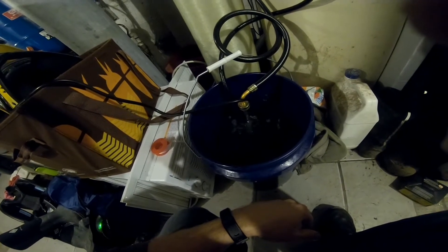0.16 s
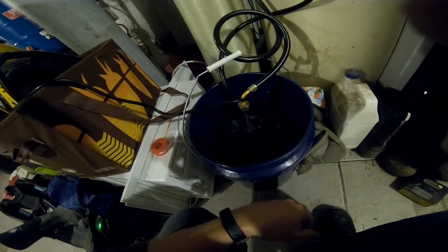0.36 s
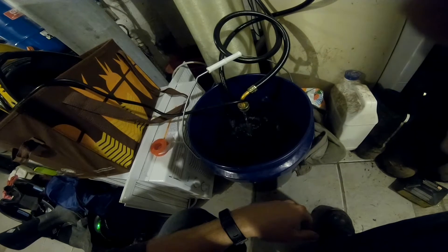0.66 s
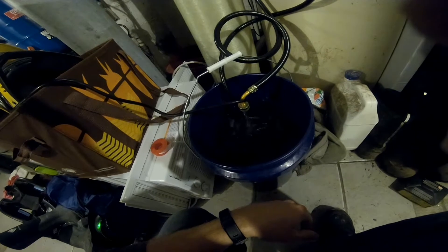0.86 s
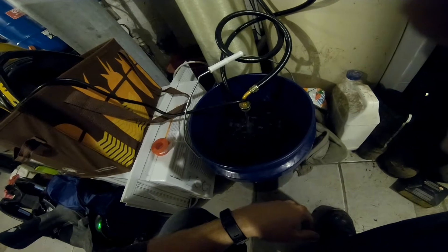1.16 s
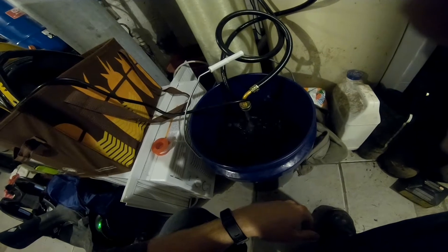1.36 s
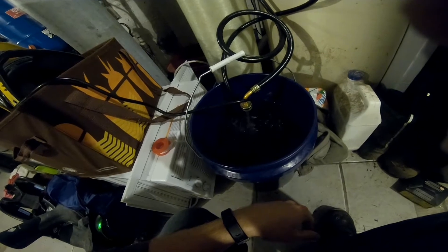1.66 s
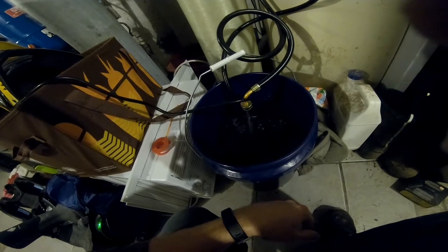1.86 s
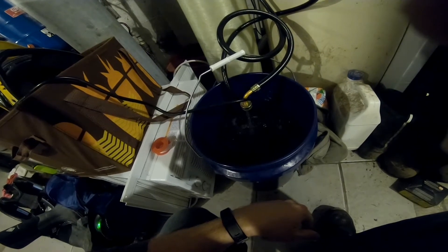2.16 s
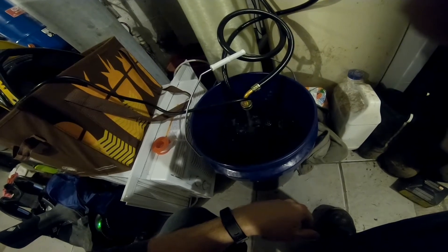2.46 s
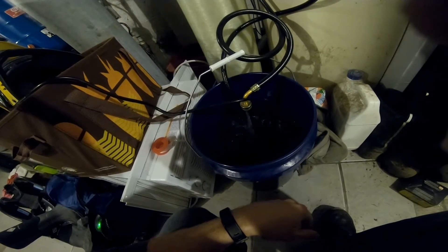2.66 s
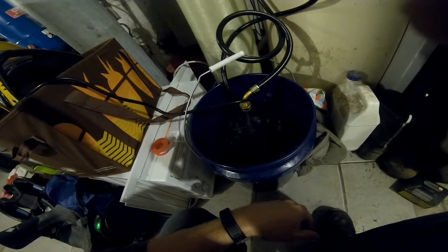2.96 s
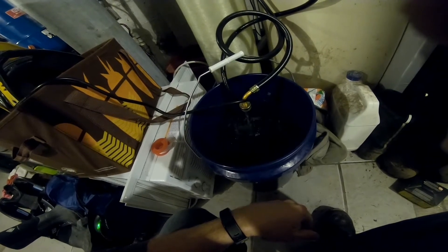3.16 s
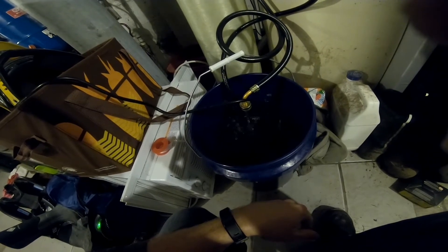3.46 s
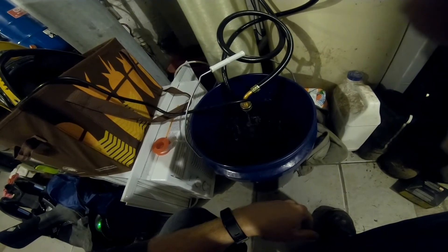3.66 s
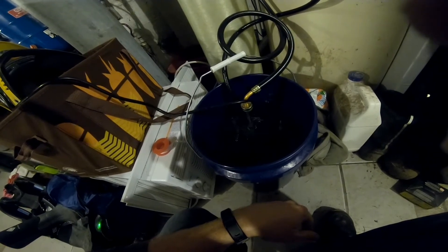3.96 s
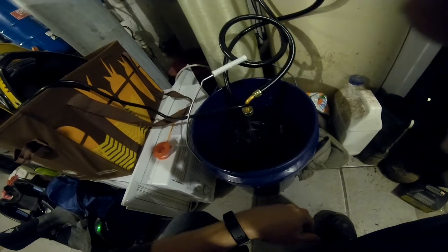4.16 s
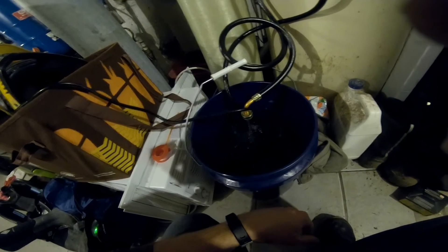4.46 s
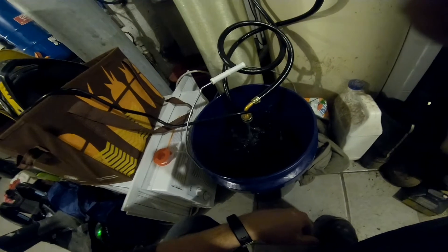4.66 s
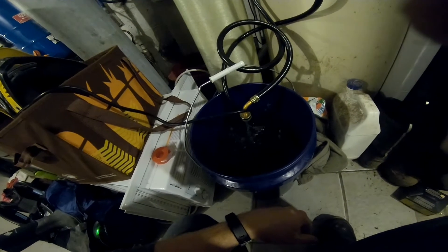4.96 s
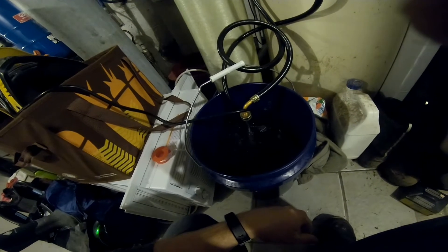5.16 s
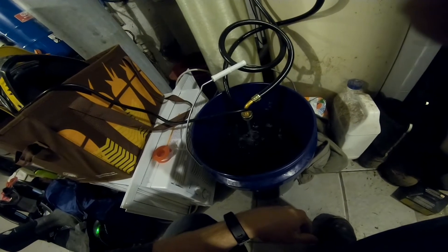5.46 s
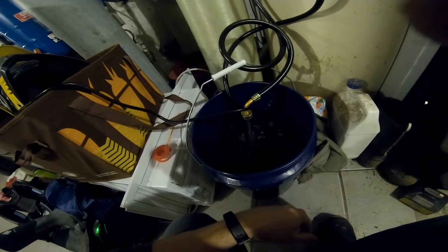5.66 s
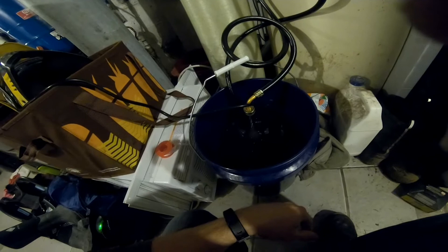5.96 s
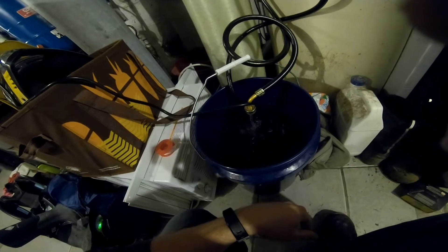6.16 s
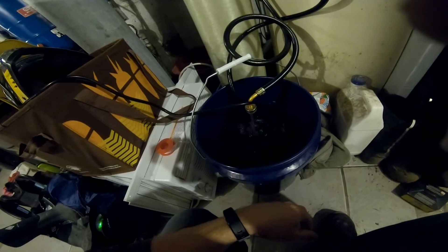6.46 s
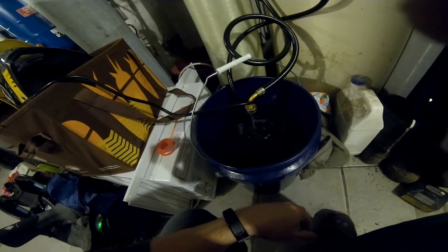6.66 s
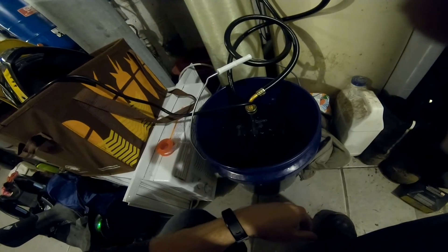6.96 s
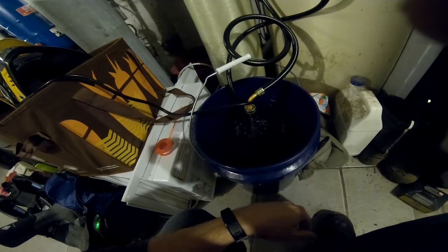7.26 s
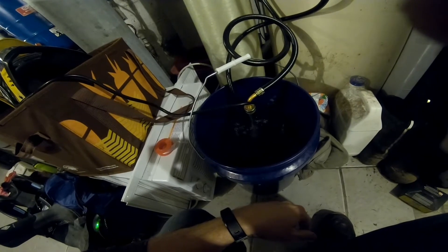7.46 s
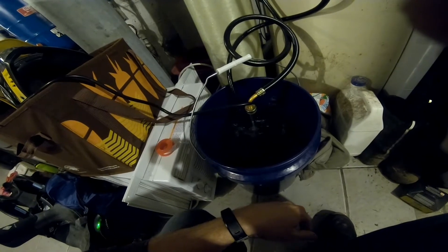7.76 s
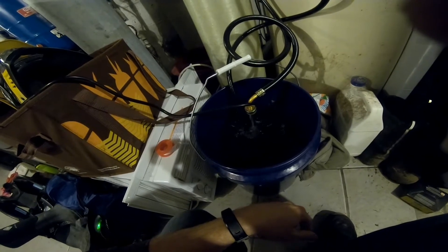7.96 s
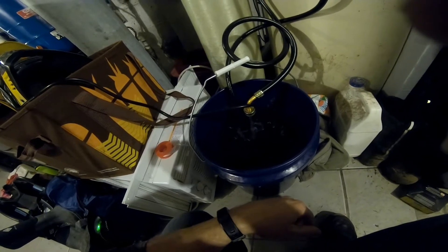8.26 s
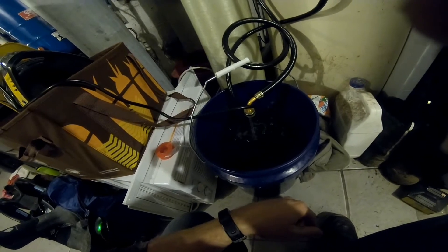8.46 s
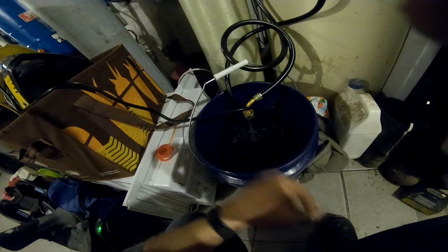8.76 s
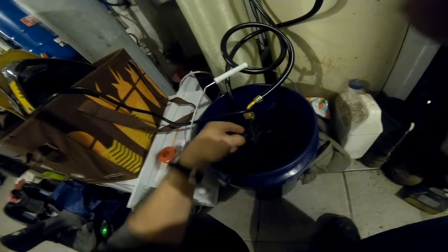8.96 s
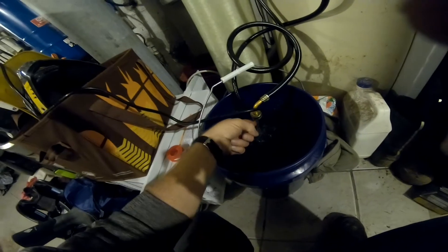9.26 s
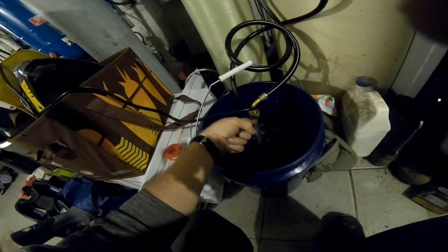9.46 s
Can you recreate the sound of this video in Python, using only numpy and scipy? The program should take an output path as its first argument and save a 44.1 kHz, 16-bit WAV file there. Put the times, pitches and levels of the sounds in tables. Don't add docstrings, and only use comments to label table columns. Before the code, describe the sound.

Close, lively water dribble with bright splats, ticks and hollow plops in a bucket, while a small pump hums steadily underneath.

```python
import sys
import numpy as np
from scipy import signal
from scipy.fft import rfft, irfft, next_fast_len
from scipy.io import wavfile
from scipy.ndimage import uniform_filter1d

SR = 44100
rng = np.random.default_rng(int(sys.argv[2]) if len(sys.argv) > 2 else 0)


def voltage_ratio(level):
    return 10 ** (np.asarray(level, float) / 20)


def int16_out(signal):
    q = np.round(np.clip(np.atleast_2d(signal).T, -1, 1) * 32767)
    wavfile.write(sys.argv[1], SR, q.astype(np.int16))


N = 424241


def evened(x):
    return x / np.sqrt(np.mean(x ** 2) + 1e-20)


def read(points, hz):
    f, value = np.transpose(points)
    return np.interp(np.log(hz + 1), np.log(f + 1), value)


def add(mix, start_s, sound):
    part = mix[round(start_s * SR):][:len(sound)]
    part += sound[:len(part)]


def coloured(points):
    hz = np.fft.rfftfreq(N, 1 / SR)
    nearest_hz = np.clip(hz, points[0][0], points[-1][0])
    edge_db = -30 * abs(np.log2((hz + 1) / (nearest_hz + 1)))
    white = rfft(rng.standard_normal(N))
    return evened(irfft(white * voltage_ratio(read(points, hz) + edge_db), N))


def bubble(hz, cycles, rise, soft=0.25):
    u = np.arange(int(5 * cycles * SR / hz)) * hz / SR
    wave = np.sin(2 * np.pi * (u + rise * u ** 2 / (2 * cycles)))
    return wave * np.exp(-u / cycles) * (1 - np.exp(-u / soft))


def scattered(per_s, spread_db, clumps):
    slots = N // 8
    at = np.flatnonzero(rng.random(slots) < 8 * per_s * clumps[::8][:slots] / SR)
    train = np.zeros(N)
    where = 8 * at + rng.integers(0, 8, slots)[at]
    train[where] = voltage_ratio(spread_db * np.minimum(rng.exponential(1, slots)[at], 4))
    return train


def rumble():
    # time in seconds, level in dB.
    surges = [(0.0, -26), (0.1, -29), (0.53, -20.5), (0.8, -27), (2.25, -25), (2.33, -55), (2.54, -18),
              (3.8, -25.5), (4.9, -23.5), (5.3, -20.5), (5.75, -27), (7.1, -22), (7.69, -24.5), (7.75, -70),
              (7.83, -22.5), (8.9, -29.5), (9.2, -19.5), (9.62, -29.5)]
    # frequency in Hz, level in dB per Hz.
    deep_spectrum = [(16, -10.5), (22, -3.5), (28, -16), (34, -15.5), (40, 3), (46, 3), (52, -11), (60, 1),
                     (68, -19)]
    boom_spectrum = [(58, -40), (64, -1), (72, -8), (83, 4.5), (90, -2.5), (96, -21.5), (104, -41)]
    drone_spectrum = [(88, -50), (98, 3), (140, 1.5), (175, -8.5), (192, -8), (205, -11), (280, -17),
                      (400, -16.5), (445, -25.5), (480, -29.5), (560, -31.5), (700, -36), (1400, -42.5),
                      (2500, -40.5)]
    unlike_spectrum = [(20, 0.5), (60, 8), (130, -7.5), (250, -10.5), (450, -11), (700, -15.5),
                       (900, -12.5), (1400, -18), (2500, -33.5)]
    # start in seconds, level in dB, frequency in Hz.
    knocks = [
        (4.06, -29, 120),
        (5.999, -9, 190),
        (8.25, -22, 120),
    ]
    # start in seconds, level in dB, frequency in Hz.
    pushes = [
        (8.0, -12.5, 14.7),
        (8.345, -11.5, 20.6),
        (8.74, -10.5, 31),
        (9.15, -9, 22),
    ]

    time_s, level_db = np.transpose(surges)
    surge_db = np.interp(np.arange(N) / SR, time_s, level_db) + 24
    parts = [coloured(deep_spectrum), coloured(boom_spectrum)]
    deep, boom = (p / (uniform_filter1d(p ** 2, size=4000) + .05) ** 0.17 for p in parts)
    mid = voltage_ratio(-29 + 0.2 * surge_db) * evened(deep)
    mid += voltage_ratio(-25.5 + surge_db) * evened(boom)
    mid += voltage_ratio(-31.5) * coloured(drone_spectrum)
    side = voltage_ratio(-47) * coloured(unlike_spectrum)
    for start_s, db, hz in knocks:
        add(side, start_s - .01, voltage_ratio(db) * bubble(hz, .45, 0))
    for start_s, db, hz in pushes:
        add(mid, start_s, voltage_ratio(db) * bubble(hz, 0.76, 0))
    return mid * voltage_ratio(np.array([[-.25], [.25]])) + side * np.array([[1], [-1]])


def hum():
    # multiple of the buzz, left level in dB, right level in dB.
    tones = [(1, -37, -36.5), (2, -53.5, -55), (3, -41, -40), (4, -60, -59.5), (5, -84, -65), (6, -79, -73),
             (7, -55.5, -44.5), (8, -65.5, -69.5), (9, -82.5, -86), (10, -62, -63), (11, -56.5, -67.5),
             (12, -80, -78.5)]
    # frequency in Hz, lead in radians.
    left_lead = [(300, 0.35), (550, -0.5), (800, 1.65), (1600, 3)]

    buzz_hz = 119.93
    t, out = np.arange(N) / SR, np.zeros((2, N))
    for k, left_db, right_db in tones:
        phase, slow = rng.random(), rng.standard_normal(40)
        waver = voltage_ratio(0.48 * np.interp(t, np.linspace(0, t[-1], len(slow)), slow))
        turn = 2 * np.pi * (k * buzz_hz * t + phase)
        out[0] += voltage_ratio(left_db) * waver * np.sin(turn + read(left_lead, k * buzz_hz))
        out[1] += voltage_ratio(right_db) * waver * np.sin(turn)
    return out


def gulps():
    # start in seconds, peak level in dB, frequency in Hz.
    big_bubbles = [(0.434, -30, 439), (1.169, -26.5, 447), (1.594, -29, 438), (1.887, -34, 463),
                   (1.99, -41, 450), (2.163, -31.5, 458), (2.257, -33, 416), (2.658, -35, 420),
                   (2.764, -29.5, 464), (2.85, -37, 415), (3.315, -40.5, 477), (3.697, -32, 447),
                   (4.959, -35, 497), (5.049, -43, 470), (5.289, -33, 438), (5.363, -35.5, 450),
                   (5.435, -30, 441), (5.693, -32, 456), (6.138, -49, 396), (6.436, -36, 469),
                   (7.098, -36.5, 481), (7.29, -36, 449), (7.423, -36, 435), (7.729, -35.5, 450),
                   (7.944, -30.5, 447), (8.085, -28.5, 448), (8.505, -35, 466), (8.987, -29.5, 480),
                   (9.368, -34, 466), (9.532, -35, 436), (9.595, -30, 503), (0.505, -32.5, 432),
                   (9.028, -32.5, 465)]

    out = np.zeros(N)
    for (start_s, db, hz), a in zip(big_bubbles, rng.random(len(big_bubbles))):
        add(out, start_s, voltage_ratio(db - 0.5) * bubble(hz * .97, 5.0 + 8.5 * a, 0.01))
    for hz, db in ((410, -60.0), (440, -46.0), (470, -46.0), (505, -51.0), (620, -73.0), (760, -58.0)):
        clicks = scattered(21.0, 2.2, np.ones(N))
        out += voltage_ratio(db) * signal.oaconvolve(clicks, bubble(hz, 6.4, 0.0041))[:N]
    return out


def spray():
    # start in seconds, peak level in dB.
    spits = [(0.317, -44), (0.3544, -45.5), (0.775, -44), (0.8825, -52), (1.0404, -46), (1.4461, -53),
             (1.5262, -43), (1.5603, -44.5), (1.694, -46), (1.8377, -46), (2.4134, -42.5), (2.516, -46),
             (2.8464, -44.5), (3.0864, -55), (3.265, -44), (3.4094, -44), (3.548, -46), (3.693, -60),
             (3.8082, -63), (3.8711, -48), (4.0412, -49), (4.0941, -46), (4.143, -40.5), (4.2775, -44.5),
             (4.8908, -50), (4.9554, -43), (5.1756, -46), (5.2873, -39), (5.8157, -45), (5.913, -44),
             (6.0282, -52), (6.343, -52), (6.3863, -41), (6.533, -38), (6.594, -46), (6.9541, -46),
             (7.2875, -47), (7.4894, -49), (7.761, -43), (7.9932, -41.5), (8.2741, -48), (8.5024, -43),
             (8.986, -44.5), (9.1995, -47), (9.3697, -38.5), (3.149, -50), (4.58, -58), (4.81, -55),
             (6.433, -47), (7.796, -48), (7.811, -46), (8.114, -45), (0.004, -47.5), (0.393, -45),
             (1.466, -46)]

    alike = 0.3
    t, out = np.arange(1200) / SR, np.zeros((2, N))
    for (start_s, db), (a, b) in zip(spits, rng.standard_normal((len(spits), 2, len(t)))):
        puff = voltage_ratio(db + 17.5) * np.exp(-t / 0.0024) * (1 - np.exp(-t / 0.00054))
        add(out[0], start_s, puff * a)
        add(out[1], start_s, voltage_ratio(-3.5) * puff * (alike * a + np.sqrt(1 - alike ** 2) * b))
    octaves = np.log2((np.fft.rfftfreq(N, 1 / SR) + 1) / 8500)
    colour_db = np.where(octaves > 0, np.maximum(-50.5 * octaves, -25), 8.0 * octaves)
    return irfft(rfft(out) * voltage_ratio(colour_db), N)


def bucket(hz, place=0):
    # frequency in Hz, width in Hz, left level in dB, right level in dB,
    # how far left runs ahead in radians.
    air_modes = [(858, 70, -4.5, -1.5, 4.5), (1676, 217, -8.5, -8.5, 1.7), (2180, 190, -4, -5, 2),
                 (2636, 370, -2.5, -7, 2.04), (2647, 265, -2, -4, 1.58), (3240, 400, -10, -11.5, 1.29),
                 (3647, 295, -12, -14.5, 0.14), (4200, 310, -2, -3, -0.02), (4134, 402, -1, -2.5, 0.31),
                 (4900, 267, -11, -6, 1.01), (5035, 44, -27.5, -1.5, 8), (5595, 360, -7.5, -0.5, 5.5),
                 (5760, 310, -8.5, -2.5, 3), (6120, 292, 0, -1, 1.18), (6737, 210, -2, 1.5, -1.24),
                 (6923, 368, -12.5, -6, -4), (7860, 660, -13.5, -19, -5), (7630, 710, -16, -37.5, 1.6),
                 (8560, 1600, -29.5, -46, 1.5), (13000, 1400, -27.5, -33, -3.5)]

    out = np.full((2, len(hz)), voltage_ratio(-39.5) + 0j)
    for k, (f, width, left_db, right_db, lead) in enumerate(air_modes):
        strength = (-1) ** k * voltage_ratio(2.5 * np.sin(place * (k + 1)))
        mode = strength / (1 + 2j * (hz - f) / width)
        out += mode * np.array([[voltage_ratio(left_db) * np.exp(1j * lead)], [voltage_ratio(right_db)]])
    return out


def bucket_gain(f):
    hz = np.linspace(300, 10000, 200)
    power = (abs(bucket(hz)) ** 2).mean(0)
    return np.interp(f, hz, np.sqrt(uniform_filter1d(power, size=15)))


def walls(wet_db, stretch):
    # delay in seconds, level in dB.
    echoes = [
        (.0022, -9.5),
        (.0046, -23.5),
        (.0097, -23.5),
        (0.022, -42),
    ]

    taps = np.zeros((2, 8000))
    at = np.arange(60, 7980, 20) + rng.integers(0, 20, (2, 396))
    tail = rng.choice([-1., 1.], at.shape) * voltage_ratio(-60 * at / SR / 0.046)
    np.put_along_axis(taps, at, tail, 1)
    taps *= voltage_ratio(wet_db) / np.linalg.norm(taps[0])
    taps[:, 0] = 1
    for delay_s, db in echoes:
        taps[[0, 1], round(delay_s * stretch * SR) + rng.integers(0, 4, 2)] += voltage_ratio(db)
    return taps


def patter():
    # time in seconds, level in dB.
    flow = [(0.0, -46.5), (1.39, -44.5), (2.57, -45.5), (2.73, -48), (5.36, -44.5), (5.76, -48.5),
            (5.95, -44.5), (7.5, -47.5), (7.98, -45.5), (8.47, -48), (9.62, -44)]

    out = np.zeros(N)
    clumps = voltage_ratio(4.0 * np.interp(np.arange(N), np.linspace(0, N, 300), rng.standard_normal(300)))
    for f, (a, b) in zip(np.geomspace(850, 8600, 20), rng.random((20, 2))):
        grain = (f / 3000) ** 0.53 * bubble(f, 1.8 + 5.2 * a, 0.425 * b)
        out += signal.oaconvolve(scattered(60, 5.0, clumps), grain)[:N]
    fizz = evened(out) + .12 * rng.standard_normal(N)
    time_s, flow_db = np.transpose(flow)
    return voltage_ratio(np.interp(np.arange(N) / SR, time_s, flow_db) + 7.5) * fizz


def bubbles():
    # start in
    # seconds, peak level in dB, frequency in Hz.
    plops = [(1.4723, -24, 2530), (1.8372, -23.5, 2470), (1.9878, -32, 1680), (2.0078, -30.5, 1620),
             (2.179, -28, 3080), (2.254, -32, 2740), (2.588, -29, 2970), (2.7182, -33, 2780),
             (2.7601, -35, 1510), (2.779, -28, 1640), (3.551, -30, 2870), (4.0955, -36, 2860),
             (4.6374, -26.5, 2360), (5.267, -29.5, 3000), (5.4164, -31.5, 2760), (5.468, -19.5, 2510),
             (5.7586, -26.5, 2470), (6.3844, -29.5, 1830), (6.439, -31, 2700), (7.0257, -28, 2310),
             (7.4889, -27.5, 3130), (7.895, -19, 2530), (8.0316, -31, 2900), (8.5456, -24.5, 2270),
             (8.738, -20.5, 2880), (8.8009, -28, 2300), (8.9638, -25.5, 2930), (8.982, -25.5, 3400),
             (9.0525, -28, 2810), (9.0738, -21.5, 2480), (9.1007, -24.5, 2540), (4.81, -30.5, 2680),
             (7.813, -28, 2770), (8.047, -31, 3000), (3.089, -31, 2900),
             (0.2578, -32, 2090), (0.352, -33, 1800), (0.4319, -42, 2040), (0.5918, -39, 3200),
             (0.6858, -34, 2120), (0.7762, -34, 1650), (0.8704, -30.5, 2610), (0.915, -33, 1630),
             (1.028, -39, 4360), (1.089, -33, 2670), (1.2145, -30, 4000), (1.4094, -33.5, 1620),
             (1.4263, -29, 2330), (1.5443, -33, 2790), (1.632, -29, 1760), (2.0456, -31.5, 2190),
             (2.24, -38.5, 1660), (2.314, -26.5, 2550), (2.5147, -30.5, 2570), (2.6918, -30, 2850),
             (3.1792, -35, 2960), (3.2131, -32, 1766), (3.293, -36, 2920), (3.3827, -29.5, 2100),
             (4.204, -32, 2630), (4.5442, -31, 2630), (4.788, -35.5, 1760), (4.8594, -34, 4040),
             (4.887, -36, 4070), (4.998, -33, 1680), (5.0345, -31.5, 4000), (5.225, -33, 2600),
             (5.286, -22, 4170), (5.5438, -28.5, 2250), (5.8184, -27.5, 2720), (6.0197, -41, 2180),
             (6.118, -32, 2650), (6.1954, -31, 2650), (6.2945, -37, 1705), (6.459, -31, 2560),
             (6.5187, -34, 2800), (6.5301, -25.5, 4130), (6.6583, -37, 2800), (6.7333, -30.5, 2260),
             (6.9132, -34, 2630), (6.9564, -34.5, 1660), (7.049, -31, 3150), (7.2175, -32.5, 2720),
             (7.42, -30, 2700), (7.937, -30, 2800), (8.104, -32, 4100), (8.1907, -35.5, 2700),
             (8.3132, -29.5, 2690), (8.5034, -23.5, 2170), (8.8522, -30.5, 2160), (9.1446, -31, 2430),
             (9.373, -31, 2760), (9.4614, -32, 2650), (9.5017, -31, 2620)]
    clunks = [(0.914, -40.5, 980), (1.767, -31, 936), (2.2, -41, 950), (2.788, -45, 874), (5.199, -53, 960),
              (6.249, -45, 896), (6.398, -38, 1290), (6.593, -35.5, 773), (7.809, -37.5, 956),
              (8.827, -41.5, 935)]

    out = np.zeros((3, N))
    rows = plops + clunks
    for k, ((start_s, db, f), (a, b)) in enumerate(zip(rows, rng.random((len(rows), 2)))):
        ring = bubble(f * .86, 3.02 + 4.5 * a, 0.12 + .2 * b, soft=0.44)
        add(out[k % 3], start_s, voltage_ratio(db + 3.0) / bucket_gain(f) * ring)
    return out


def drops():
    # start in seconds, peak level in dB, frequency in Hz, low slap in dB.
    splats = [(0.4317, -19.5, 5800, -9), (0.557, -20.5, 5830, -35), (0.7745, -17.5, 6560, -7),
              (1.4477, -22, 5830, -0.5), (2.2096, -16, 6200, -20), (2.3134, -18.5, 6200, -9),
              (2.515, -16, 6100, -4.5), (3.0825, -15, 6000, -10), (3.411, -16, 6330, -22),
              (3.5493, -17.5, 6500, -21), (3.694, -13.5, 6190, -43), (3.871, -11.5, 6280, -22),
              (4.0945, -17.5, 6800, -9), (4.4014, -21, 6600, -28), (5.175, -18.5, 6100, -36),
              (5.247, -15, 6530, -23), (5.286, -14.5, 6450, -40), (5.4335, -17.5, 6160, -5),
              (5.4873, -19.5, 6800, -2.5), (6.0288, -20, 5870, -27), (6.5312, -20, 6100, -5.5),
              (6.954, -19.5, 6840, -9.5), (7.151, -20, 6000, -5.5), (7.1787, -22.5, 5840, -14),
              (7.4895, -14, 6100, -16), (7.793, -22.5, 5760, -14), (8.4966, -15.5, 5800, -11),
              (9.3259, -20, 6440, -26), (9.3707, -13, 6070, -23), (9.434, -18, 7000, -32)]
    drips = [(0.292, -29.5, 5760, 0.5), (0.3162, -24, 6270, -3.5), (0.3561, -21.5, 6450, -14),
             (0.3925, -26.5, 7800, -19), (0.9475, -22, 6100, -18), (1.041, -20.5, 5960, -7.5),
             (1.5283, -23.5, 6900, -25), (1.631, -24, 6200, 1), (1.701, -27, 7000, -26),
             (1.8393, -20, 6260, -10), (1.9865, -22, 6240, -15), (2.0527, -20, 6370, -15),
             (2.845, -34, 7600, -11), (2.9933, -22.5, 6440, -9), (3.133, -29, 6000, -28),
             (3.2138, -29.5, 7260, 8), (3.6082, -24.5, 6640, -18), (3.809, -20.5, 6360, -13),
             (4.8878, -24, 6040, -9), (5.163, -23.5, 6050, -12), (5.71, -24.5, 6530, -5),
             (5.8402, -20.5, 6700, -29), (6.343, -26, 6400, -22), (6.727, -26, 5850, -8),
             (7.541, -27, 6600, -25), (8.297, -24, 6200, -5), (8.385, -23, 5970, -5),
             (8.8047, -29.5, 5500, 7), (8.9845, -27, 5700, -23), (9.099, -26.5, 7100, -7)]
    # start in seconds,
    # peak level in dB, frequency in Hz.
    pings = [(0.761, -35, 4900), (0.8125, -28.5, 4870), (0.877, -23, 5250), (1.166, -28.5, 4670),
             (1.3562, -29, 4900), (2.661, -29.5, 4570), (2.786, -30, 4900), (3.639, -32.5, 4200),
             (4.1413, -26, 4720), (4.741, -30, 4800), (5.025, -31.5, 5000), (5.4214, -36.5, 4560),
             (6.4192, -28, 4800), (6.677, -23.5, 5000), (7.0875, -29, 3800), (7.287, -23, 5570),
             (8.7348, -30, 4230), (9.131, -21.5, 5100), (0.0798, -27.5, 6600), (1.916, -27, 6600),
             (2.163, -26, 6560), (4.4916, -25, 6600), (5.57, -26.5, 6960), (6.3878, -30.5, 7000),
             (6.594, -28.5, 6000), (8.103, -35, 6800), (8.608, -26, 6000), (4.3807, -45.5, 5020),
             (6.9362, -47, 4800), (8.2736, -26, 6700),
             (0.255, -35, 6720), (0.634, -36, 6410), (0.913, -30.5, 6410), (0.9305, -36, 6270),
             (0.9922, -33.5, 4770), (1.3013, -26, 6860), (1.464, -19.5, 6380), (1.561, -42, 7890),
             (1.941, -34.5, 4730), (2.358, -26.5, 4880), (2.478, -32, 6170), (2.597, -35, 6180),
             (2.933, -42, 4700), (3.1485, -26, 6760), (3.263, -31, 5860), (3.3814, -37.5, 6480),
             (3.912, -30, 5000), (3.993, -31.5, 6020), (4.0408, -33.5, 6210), (4.2777, -48, 6630),
             (4.6236, -44, 6200), (4.7832, -30, 6120), (4.9535, -28.5, 6950), (5.3928, -28, 6780),
             (5.6331, -38.5, 6210), (5.8162, -25, 6620), (5.898, -28.5, 5670), (5.9554, -36, 6150),
             (6.13, -28.5, 6150), (6.187, -26.5, 6200), (6.2915, -27, 6000), (6.6466, -31.5, 6180),
             (6.6608, -27, 4650), (6.774, -31, 6100), (6.873, -28.5, 6100), (6.983, -29, 6400),
             (7.3295, -40, 6330), (7.3796, -34.5, 6300), (7.417, -27.5, 6780), (7.5767, -33.5, 6060),
             (7.7595, -30, 6700), (7.9932, -41, 6190), (8.528, -28, 6150), (8.709, -37, 5560),
             (8.9086, -32, 6800), (9.2, -29, 6820), (4.624, -33, 6000), (4.8, -28, 6400), (6.32, -36, 6400),
             (6.433, -28, 6200), (7.655, -30, 6430), (7.808, -27, 6300), (8.033, -28, 6300),
             (8.114, -28, 6750), (3.141, -33, 4200), (8.148, -35, 4050), (6.683, -30, 6460),
             (7.855, -35, 7800), (7.999, -29.5, 6600)]

    out = np.zeros((3, N))
    rows = splats + drips + [(*row, -6) for row in pings]
    t, lead_s = np.arange(2000) / SR, 0.0046
    spatter = np.diff(rng.standard_normal((len(rows), len(t) + 1)))
    spatter = uniform_filter1d(spatter, size=3, axis=1)
    spatter = spatter * np.exp(-t / 0.0067) * np.minimum(t / lead_s, 1) ** 2
    for k, ((start_s, db, f, low_db), (a, b)) in enumerate(zip(rows, rng.random((len(rows), 2)))):
        patch = out[k % 3]
        ring = bubble(f * 0.966, 1.5 + 1.5 * a, 0.015, soft=0.61)
        body = bubble(4000 + 1000 * b, 2.54, 0.087)
        tick = bubble(9000 + 2500 * a, 0.46, 0)
        slap = bubble(1900 + 1200 * b, 1.72, 0.4)
        add(patch, start_s - lead_s, voltage_ratio(db + 4.0) * spatter[k])
        add(patch, start_s, voltage_ratio(db + 11.0) / bucket_gain(f) * ring)
        add(patch, start_s, voltage_ratio(db + 2.0) * body)
        add(patch, start_s, voltage_ratio(-22.5 + 0.39 * db + 15.0 * b ** 2) * tick)
        add(patch, start_s, voltage_ratio(db + low_db + 14.5) * slap)
    return out


def water():
    size = next_fast_len(N + 16000)
    middle, near, far = drops() + bubbles()
    paths = [(middle, walls(-3.5, 1)),
             (near + patter(), walls(-5.5, 0.77)),
             (far + patter(), walls(-3.0, 1.27))]
    hz, total = np.fft.rfftfreq(size, 1 / SR), 0
    for place, (x, taps) in enumerate(paths):
        colour = np.array([np.interp(hz, hz[::64], port) for port in bucket(hz[::64], 2 * place)])
        total = total + rfft(x, size) * rfft(taps, size) * colour
    return irfft(total, size)[:, :N]


def scene():
    return rumble() + hum() + gulps() + spray() + water()


def band_limit(x):
    return signal.sosfilt(signal.butter(12, 15450, fs=SR, output="sos"), x)


def record(dry):
    dull = signal.sosfilt(signal.butter(2, 11000, fs=SR, output="sos"), dry)
    hiss = voltage_ratio(-96.5) * rng.standard_normal(dry.shape)
    return band_limit(dull + hiss)


dry = scene()
out = record(dry)
int16_out(out)
```